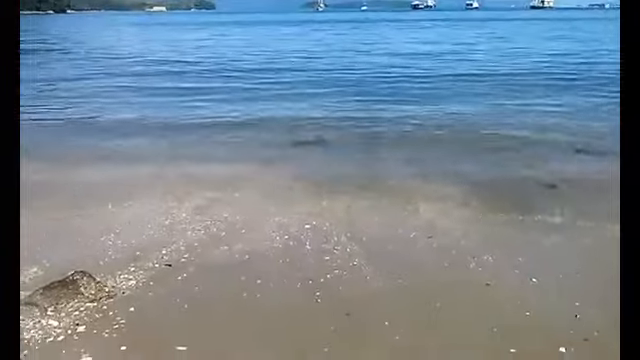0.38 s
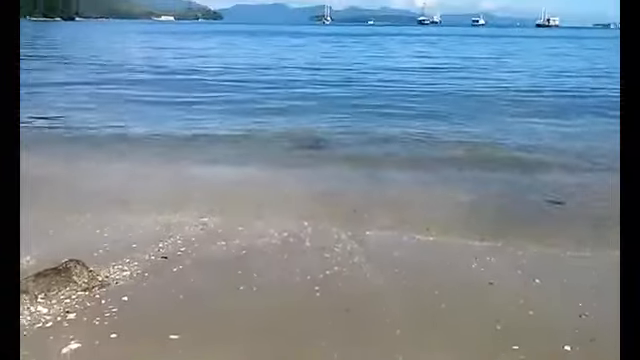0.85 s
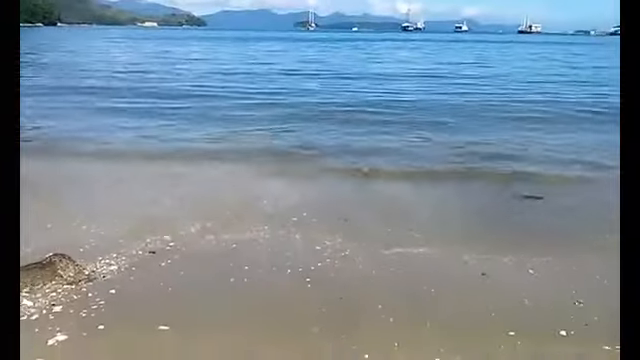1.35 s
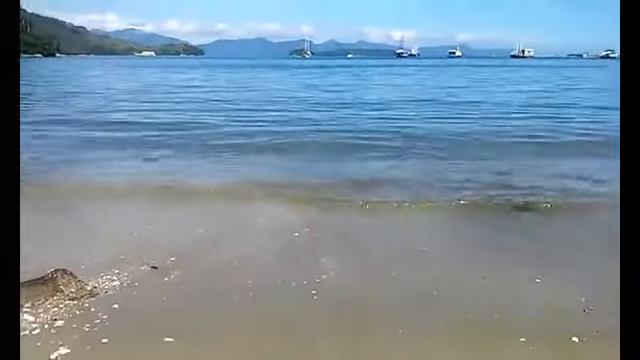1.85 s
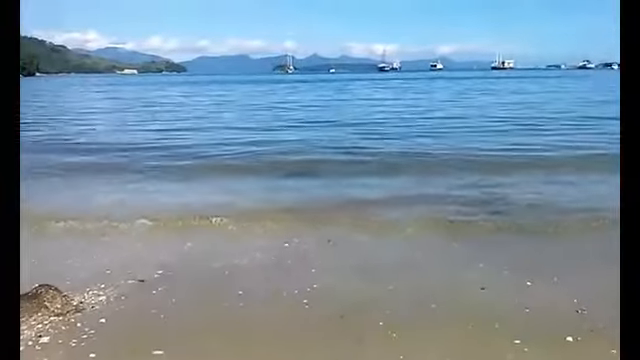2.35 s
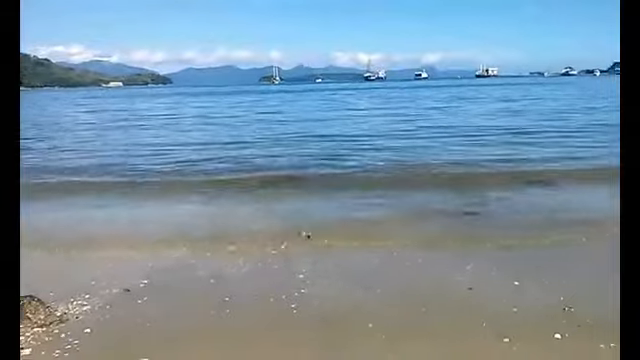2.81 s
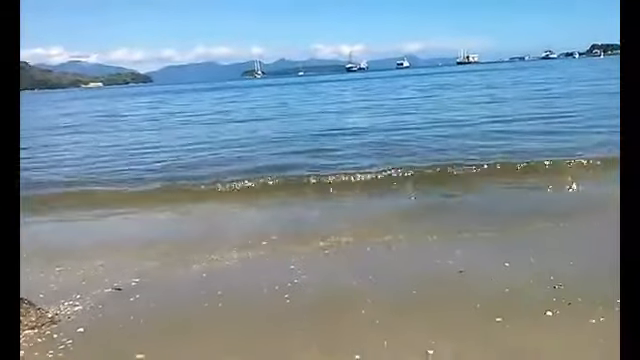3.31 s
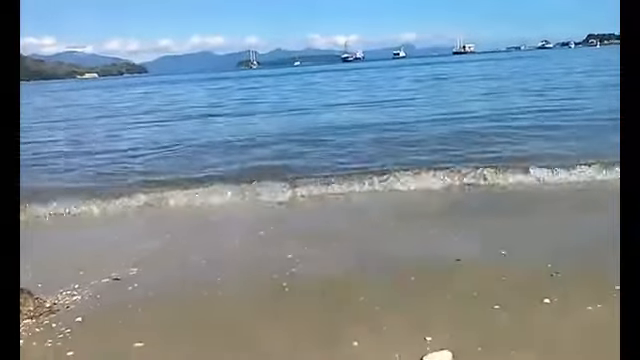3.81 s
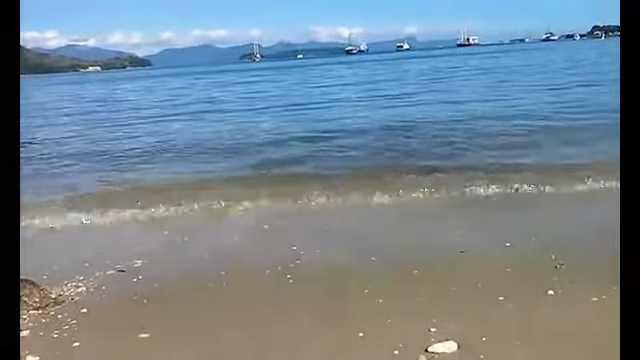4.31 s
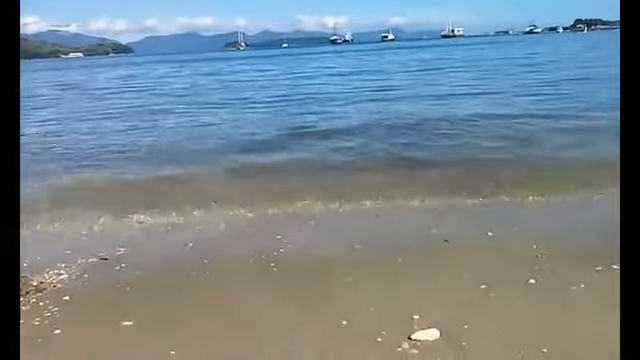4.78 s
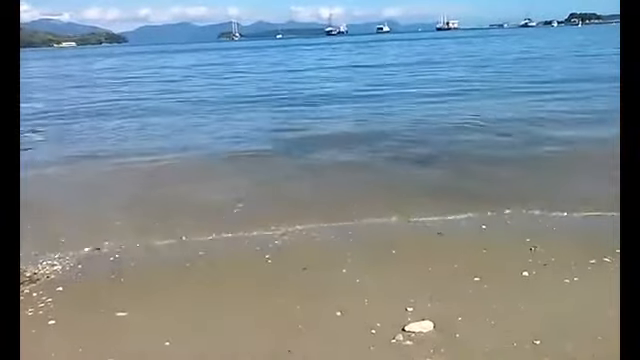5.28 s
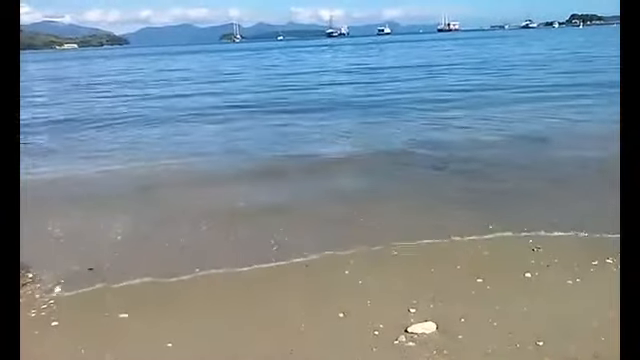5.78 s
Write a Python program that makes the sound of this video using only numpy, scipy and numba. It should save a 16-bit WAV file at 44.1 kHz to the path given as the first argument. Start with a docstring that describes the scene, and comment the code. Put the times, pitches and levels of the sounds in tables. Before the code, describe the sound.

On a calm bay beach, a thin backwash fizzles away, leaving soft air murmur and a few clear bubble plips. A small wavelet spills with light trickling and fizz, then a larger wave breaks in a bright, bubbly rush with snapping drops. Its foam hisses up the sand and fades. A handheld microphone stays close, in mono, with faint device ticks and light low wind.

```python
"""Small waves on the sandy shore of a calm bay: a backwash dies away, a few lone bubbles pop, a wavelet spills,
then a larger wave breaks and its swash fizzes up the sand and fades. Water sounds are crowds of decaying sine
bubbles, doubled by an inverted shore echo, plus lone bubbles, drop snaps and a spray of shaped noise. Beneath lie
a noise murmur of sea and air, wind on the single microphone and a faint regular tick of the handheld device."""
import sys
import numpy as np
from scipy import signal
from scipy.fft import rfft, irfft
from scipy.io import wavfile
from scipy.ndimage import map_coordinates
from numba import njit

SR = 44100
rng = np.random.default_rng(int(sys.argv[2]) if len(sys.argv) > 2 else 0)


def level_to_linear(level):
    """Convert decibel levels to linear amplitude factors, elementwise."""
    exponent = np.asarray(level, float) / 20
    return 10 ** exponent


def persist_wave(psi):
    """Save psi, clipped to +-1, as 16-bit WAV."""
    counts = np.round(np.clip(psi, -1, 1) * 32767).astype(np.int16)
    wavfile.write(sys.argv[1], SR, np.atleast_2d(counts).T)


N = 270774

# fine foam: time_s, fizz_db, sizzle_above_fizz_db
FOAM_CURVE = [(0.0, -52.5, -12.5), (0.15, -57, -7), (0.44, -69, -13), (0.72, -77.5, -14), (1.02, -72.5, -6),
              (1.45, -67.5, -13), (1.58, -53.5, -8.5), (1.88, -46, -12.5), (2.0, -47.5, -12.5),
              (2.37, -44, -12), (2.77, -46.5, -17), (3.22, -46, -21), (3.3, -46, -11.5), (3.37, -38.5, -11),
              (3.66, -33.5, -12.5), (3.93, -29.5, -15), (4.27, -35, -14), (4.67, -45, -11),
              (4.82, -48.5, -11.5), (5.16, -49.5, -14.5), (5.42, -44.5, -16.5), (5.72, -52.5, -14.5),
              (5.93, -57.5, -9), (6.14, -70, -14)]


def rms_one(x):
    """Scales to an rms of 1."""
    return x / np.sqrt(np.mean(x ** 2) + 1e-20)


def columns(rows, s):
    """Every column of a curve table, read at the times s."""
    t, *rest = np.transpose(rows)
    return [np.interp(s, t, c) for c in rest]


def drift(rate_hz, s):
    """Slow chance of spread 1, twice smoothed noise, read at the times s."""
    control_hz, count, settle = 1000, 7000, 2000
    r = np.exp(-2 * np.pi * rate_hz / control_hz)
    noise = rng.standard_normal(count + settle)
    slow = signal.lfilter([1], [1, -2 * r, r * r], noise)[settle:]
    return np.interp(s * control_hz, np.arange(count), rms_one(slow))


def coloured(spectrum):
    """Steady noise with the given spectrum, rms 1."""
    hz, db = np.transpose(spectrum)
    grid_hz = np.maximum(np.fft.rfftfreq(N, 1 / SR), 1)
    gain = level_to_linear(np.interp(np.log(grid_hz), np.log(hz), db))
    return rms_one(irfft(rfft(rng.standard_normal(N)) * gain, N))


@njit
def ringing(size, rate, start, height, hz, length, rise):
    """Each bubble swells and fades as u exp(1 - u), its pitch climbing as it nears the surface."""
    out = np.zeros(size)
    for k in range(len(start)):
        first = int(start[k] * rate)
        peak = length[k] * rate / 4   # samples from birth to loudest
        phase = 0.0
        step = 2 * np.pi * hz[k] / rate
        for i in range(max(0, min(int(7 * peak), size - first))):
            u = i / peak
            phase += step * (1 + rise * (u - 1))
            out[first + i] += height[k] * u * np.exp(1 - u) * np.sin(phase)
    return out


def swarm(level_db, pitch_hz, octaves, cycles, uneven_db, clump_db, count):
    """Bubbles born at random: pitches scatter about a mean, sizes are uneven, loudness comes in clumps."""
    when, tone, big, ring = rng.random((4, count))
    s = when * N / SR
    clumps = drift(12.0, s)
    hz = pitch_hz(s) * 2 ** (octaves * (tone + rng.random(count) - 1))
    length_s = cycles * (.5 + ring) / hz
    # uneven_db > 0: a few stand out; < 0: a few are much softer
    height = level_to_linear(-uneven_db * np.log(big + 0.0067) + clump_db * clumps)
    height = height / np.sqrt(length_s)   # equal energy at any length
    power = np.mean(height ** 2 * length_s) * .231 * count * SR / N   # .231: energy of one envelope
    height = height * level_to_linear(level_db(s)) / np.sqrt(power)
    return ringing(N, SR, s, height, hz, length_s, 0.0061)


def clicks(rows, low_hz, tail_s, tail_db):
    """A bright click with a short breath of decaying hiss behind it."""
    s, db = np.transpose(rows)
    hits = np.full(N, 1e-18)
    hits[(s * SR).astype(int)] = level_to_linear(db + 4.5)
    envelope = signal.lfilter([level_to_linear(tail_db)], [1, -np.exp(-1 / (tail_s * SR))], hits)
    tail = envelope * rng.standard_normal(N)
    return signal.sosfilt(signal.butter(4, low_hz, "high", fs=SR, output="sos"), hits + tail)


def murmur():
    """Far sea, air and microphone hiss: shaped noise with a slowly wavering level."""
    # frequency_hz, relative_db_per_hz
    spectrum = [(120, -7), (250, -1), (350, -3), (600, -7), (1200, -15), (2400, -9.5), (4500, -21.5),
                (6500, -26.5), (9000, -37), (12000, -30), (14000, -31), (15600, -30)]
    s = np.arange(N) / SR
    return coloured(spectrum) * level_to_linear(-61 + 1.2 * drift(15.0, s))


def wind():
    """Low noise of a light wavering breeze; each puff swells quickly and dies away."""
    # frequency_hz, relative_db_per_hz
    spectrum = [(20, -24), (38, -30), (60, -9), (105, 12), (150, 10.5), (250, -20.5)]
    # puffs of wind on the microphone: peak_time_s, level_db
    gusts = [(1.85, -79), (2.33, -74), (2.72, -71), (2.99, -63.5), (4.74, -75), (5.81, -68)]
    rise_s, fall_s, breeze_db = 0.037, 0.087, -72.5
    s = np.arange(N) / SR
    puffs = np.zeros(N)
    for at_s, level_db in gusts:
        puffs += level_to_linear(level_db) * np.exp(np.minimum((s - at_s) / rise_s, (at_s - s) / fall_s))
    return coloured(spectrum) * (level_to_linear(breeze_db + 1.5 * drift(3.2, s)) + puffs)


def device_ticks():
    """Regular tick of the device: high-passed clicks, each with a faint tail of hiss."""
    # start_s, level_db
    tick_rows = [(0.16, -39.5), (0.802, -42), (1.4431, -49), (2.0847, -40), (2.7244, -58), (5.2814, -43),
                 (5.9234, -38.5)]
    return clicks(tick_rows, low_hz=7600.0, tail_s=0.1, tail_db=-30.0)


def spray():
    """The finest droplets merge into a flickering hiss that follows the foam."""
    # frequency_hz, relative_db_per_hz
    spectrum = [(6000, -34), (8000, 8), (9500, 2), (11500, 4), (14000, -2.5), (15600, -4.5)]
    # swell of the spray hiss: time_s, level_db
    spray_swell = [(0.0, 1.5), (0.9, 6), (1.6, -3), (2.3, 0.1), (3.2, 0), (3.4, 0.5), (4.1, -1.5), (5.0, 5),
                   (5.5, -2.5), (6.14, -1)]
    below_fizz_db, per_sizzle_db = -15, 0.48
    s = np.arange(N) / SR
    fizz_db, sizzle_db = columns(FOAM_CURVE, s)
    level_db = fizz_db + below_fizz_db + per_sizzle_db * sizzle_db + columns(spray_swell, s)[0]
    return coloured(spectrum) * level_to_linear(level_db + 1.1 * drift(40.0, s))


def drop_snaps():
    """Flying drops snap on landing: short clicks, softened at the very top."""
    # start_s, level_db
    snap_rows = [(1.8597, -55), (2.3301, -46), (2.343, -44), (2.3775, -50), (2.77, -50), (2.83, -49),
                 (3.285, -55), (3.3992, -37), (3.5144, -43), (3.6451, -32), (3.903, -42), (4.1944, -35),
                 (4.54, -41), (4.64, -41), (4.6758, -41), (4.697, -43), (4.8888, -42), (4.9781, -48)]
    return signal.lfilter([.5, .5], [1], clicks(snap_rows, low_hz=6500.0, tail_s=0.0021, tail_db=-7.0))


def lone_bubbles():
    """The bubbles that stand out one by one, each a swelling and fading sine."""
    # start_s, peak_db, pitch_hz, length_ms
    plip_rows = [(0.037, -42, 1180, 16), (.074, -45, 1297, 26), (.078, -42.5, 4760, 5.1),
                 (.403, -44, 2070, 6), (0.4574, -42, 2650, 5.3), (0.5, -49, 2680, 6),
                 (.5501, -48, 2100, 8.2), (0.843, -54, 4670, 2.6), (1.0141, -43.5, 3100, 3.1),
                 (1.0235, -56, 4800, 4), (1.034, -57, 4930, 5), (1.0464, -35, 2520, 5.1),
                 (1.054, -29, 2510, 5.3), (1.1034, -48, 2300, 6), (1.1234, -51, 2500, 8),
                 (1.1603, -45, 3150, 3.7), (1.2106, -55, 3600, 6), (1.281, -59, 6100, 5),
                 (1.3443, -56, 5070, 5.6), (1.543, -35, 4050, 5.7), (1.593, -41, 1390, 12),
                 (1.756, -33.5, 1880, 10), (1.821, -38, 1330, 13), (1.853, -43.5, 765, 23),
                 (1.9021, -32.5, 3880, 7.8), (1.972, -34, 2350, 6.5), (2.055, -36, 1840, 23),
                 (2.245, -42.5, 660, 16), (2.297, -34, 1290, 18), (2.3553, -29, 4240, 3),
                 (2.4, -31.5, 4500, 3.5), (2.564, -38, 978, 36), (2.7, -48.5, 252, 49), (2.9, -45, 370, 28),
                 (2.962, -37, 973, 18), (3.0, -42, 993, 35), (3.034, -33, 1134, 15), (3.12, -43.5, 608, 28),
                 (3.254, -30.5, 4540, 2.7), (3.352, -36, 890, 17), (3.392, -15, 2080, 4.9),
                 (3.495, -26, 1007, 12), (3.714, -23, 766, 20), (3.934, -20, 508, 17),
                 (3.511, -47.5, 273, 27), (4.08, -31.5, 563, 23), (4.2805, -40, 12000, 2.2),
                 (4.523, -27.5, 1056, 12), (4.6758, -28, 4730, 3.5), (4.86, -39.5, 1235, 20),
                 (4.9172, -36.5, 4750, 5.9), (4.9442, -30, 5070, 2.4), (5.204, -43, 3640, 20),
                 (5.2684, -37.5, 4660, 11), (5.3527, -46, 2330, 10), (5.368, -55.5, 677, 21),
                 (5.44, -56, 648, 33), (5.5014, -37, 4840, 5.1), (5.698, -41, 4970, 6),
                 (5.74, -50, 1870, 7), (5.7598, -42, 2350, 11), (5.817, -53, 2580, 9),
                 (5.8444, -52, 2400, 8), (5.9239, -44.5, 4350, 13), (5.9758, -51, 2350, 10)]
    s, db, hz, ms = np.transpose(plip_rows)
    return ringing(N, SR, s, level_to_linear(db), hz, ms / 1000, 0.0032)


def foam():
    """Tiny bubbles burst in the foam, drops crackle as they land and a few of the finest spit."""
    # mean pitch of the fizz, wandering: time_s, pitch_hz
    fizz_pitch = [(0.0, 4030), (0.8, 4540), (1.5, 4090), (2.0, 4310), (2.35, 4360), (3.1, 3990),
                  (3.4, 4390), (4.2, 4285), (4.6, 4490), (5.2, 4010), (5.55, 4080), (5.8, 4530),
                  (6.14, 4450)]
    # mean pitch of the sizzle, rising as the foam dries out: time_s, pitch_hz
    sizzle_pitch = [(0.0, 6150), (1.6, 6100), (2.4, 6350), (3.1, 6150), (3.5, 6430), (4.6, 6370),
                    (5.3, 6630), (6.14, 6700)]

    def fizz_db(s):
        return columns(FOAM_CURVE, s)[0]

    def sizzle_db(s):
        return sum(columns(FOAM_CURVE, s))

    def landing_db(s):   # drops drown in the loudest foam
        return np.minimum(fizz_db(s), -45.0)

    def spit_db(s):
        return np.minimum(sizzle_db(s), -56.0)

    fizz = swarm(fizz_db, lambda s: columns(fizz_pitch, s)[0],
                 octaves=0.514, cycles=13.9, uneven_db=-0.6, clump_db=0.89, count=24000)
    sizzle = swarm(sizzle_db, lambda s: columns(sizzle_pitch, s)[0],
                   octaves=0.3, cycles=6.4, uneven_db=1.0, clump_db=1.05, count=24000)
    crackle = swarm(landing_db, lambda s: 4550.0,
                    octaves=0.13, cycles=6.7, uneven_db=-3.0, clump_db=0.8, count=1800)
    spits = swarm(spit_db, lambda s: 7600.0,
                  octaves=0.4, cycles=7.4, uneven_db=3.0, clump_db=7.0, count=400)
    return fizz + sizzle + level_to_linear(-10.5) * crackle + level_to_linear(-13.0) * spits


def surge():
    """The wave traps pockets of air and crowds of large and small bubbles; a few ring longer, as a trickle."""
    # churning water: time_s, large_bubbles_db, large_pitch_hz, air_pockets_db
    churn = [(0.0, -50, 1317, -59), (0.12, -55, 1354, -67.5), (0.31, -62.5, 1246, -66),
             (0.7, -73.5, 1270, -102), (1.2, -68.5, 1247, -80), (1.45, -68, 1100, -62.5),
             (1.6, -59, 1287, -61), (1.85, -45.5, 1260, -55), (2.17, -53, 1244, -60),
             (2.28, -46, 1293, -51), (2.65, -47, 1164, -61), (2.92, -48, 1040, -50), (3.27, -45, 1089, -49),
             (3.44, -41, 1163, -52), (3.56, -30.5, 1263, -44.5), (3.71, -30.5, 1262, -38),
             (3.95, -28.5, 1235, -31), (4.09, -31.5, 1278, -38), (4.2, -33.5, 1287, -44),
             (4.36, -37, 1292, -45.5), (4.6, -48, 1290, -60), (4.98, -57, 1312, -64.5),
             (5.2, -79, 1300, -72), (6.14, -71, 1074, -65.5)]
    # swell of the small bubbles: time_s, level_db
    small_swell = [(0.0, -1.8), (0.5, 7.5), (0.97, 1), (1.07, 8.5), (1.25, -3), (1.45, -13), (1.6, -1.5),
                   (1.9, 0.1), (2.2, -0.5), (2.7, -1.5), (3.15, -5.5), (3.42, 0.5), (3.75, 2), (4.0, -3),
                   (4.5, 3), (5.0, 0), (5.4, -1.5), (6.14, -5.5)]

    def large_db(s):
        return columns(churn, s)[0]

    def large_hz(s):
        return columns(churn, s)[1]

    def pocket_db(s):
        return columns(churn, s)[2]

    def pocket_hz(s):   # livelier pockets are smaller
        return 518.4 + 4.0 * (pocket_db(s) + 55)

    def thud_db(s):   # floor: calm water
        return np.maximum(-63.5 + 0.83 * (pocket_db(s) + 55), -72)

    def small_db(s):   # small bubbles come with both churn and foam
        from_churn = 0.55 * (large_db(s) + 48)
        from_fizz = 0.52 * (columns(FOAM_CURVE, s)[0] + 48)
        return -44.5 + columns(small_swell, s)[0] + from_churn + from_fizz

    def sparse(level_db, top_db):   # longer-ringing bubbles stop growing once the water churns
        return lambda s: np.minimum(level_db(s), top_db)

    thud = swarm(thud_db, lambda s: 285.0,
                 octaves=0.65, cycles=6.1, uneven_db=0.0, clump_db=3.0, count=1500)
    pockets = swarm(pocket_db, pocket_hz,
                    octaves=0.781, cycles=13.6, uneven_db=1.0, clump_db=0.9, count=3000)
    large = swarm(large_db, large_hz,
                  octaves=0.862, cycles=18.8, uneven_db=1.5, clump_db=1.0, count=12000)
    gurgle = swarm(sparse(large_db, -38.0), large_hz,
                   octaves=0.267, cycles=24.0, uneven_db=3.0, clump_db=-1.0, count=900)
    small = swarm(small_db, lambda s: 2350.0,
                  octaves=0.58, cycles=9.8, uneven_db=-2.0, clump_db=0.06, count=20000)
    trickle = swarm(sparse(small_db, -51.5), lambda s: 2400.0,
                    octaves=0.358, cycles=17.0, uneven_db=3.0, clump_db=1.5, count=1400)
    plops = swarm(small_db, lambda s: 1900.0,
                  octaves=1.1, cycles=20.6, uneven_db=2.0, clump_db=5.5, count=500)
    crowds = thud + pockets + large + small
    return crowds + level_to_linear(-5.0) * gurgle + level_to_linear(-2.5) * trickle + level_to_linear(-9.5) * plops


def shore_echo(x):
    """An inverted echo off the wet shore, dull in the top, cancels the first multiples of the notch pitch."""
    # path moving with the water's edge: time_s, first_notch_hz, strength (0-1)
    echo_path = [(0, 2730, 0.13), (1.3, 2650, 0), (1.45, 2550, 0.7), (1.9, 2530, 0.58), (2.4, 2820, 0.21),
                 (3.3, 3000, 0), (3.8, 2840, 0.32), (5.0, 2980, 0.35), (6.14, 2970, 0.44)]
    dull_hz = 8200
    notch_hz, strength = columns(echo_path, np.arange(N) / SR)
    dull = signal.sosfiltfilt(signal.butter(2, dull_hz, fs=SR, output="sos"), x)
    late = map_coordinates(dull, [np.arange(N) - SR / notch_hz], order=3)
    return (x - strength * late) / np.sqrt(1 + strength ** 2)


def scene():
    """One microphone feeds both channels."""
    background = murmur() + wind() + device_ticks()
    droplets = spray() + drop_snaps() + lone_bubbles()
    mono = background + droplets + shore_echo(foam() + surge())
    return np.array([mono, mono])


def band_limit(x):
    """A steep low-pass at the top of the band."""
    return signal.sosfilt(signal.butter(12, 15690, fs=SR, output="sos"), x)


def record(dry):
    """Top and bottom are cut; the microphone's case adds resonant dips and peaks."""
    # microphone in its case: centre_hz, width_hz, gain_db
    case = [(423, 215, -6), (780, 146, -3), (1193, 207, -6), (1777, 300, -5.5), (2350, 830, -5),
            (4740, 480, 1.5), (5630, 340, -1.5)]
    cutoff_hz, bass_cut_hz = 15450, 62
    x = signal.sosfilt(signal.ellip(10, .5, 60, cutoff_hz, fs=SR, output="sos"), dry)
    x = signal.sosfilt(signal.butter(2, bass_cut_hz, "high", fs=SR, output="sos"), x)
    for hz, width_hz, db in case:
        half = level_to_linear(db / 2)
        spread = np.pi * width_hz / SR
        turn = -2 * np.cos(2 * np.pi * hz / SR)
        zeros = [1 + spread * half, turn, 1 - spread * half]
        poles = [1 + spread / half, turn, 1 - spread / half]
        x = signal.lfilter(zeros, poles, x)
    return band_limit(x)


dry = scene()
out = record(dry)
persist_wave(out)
```